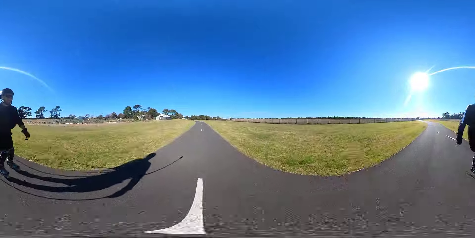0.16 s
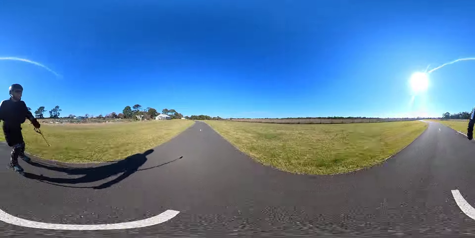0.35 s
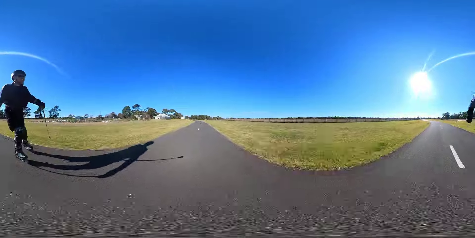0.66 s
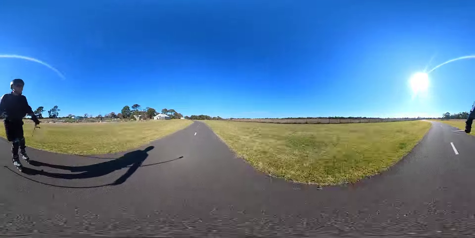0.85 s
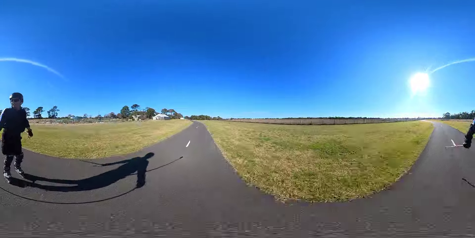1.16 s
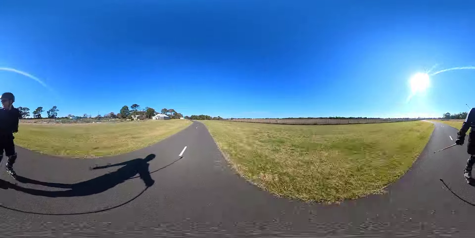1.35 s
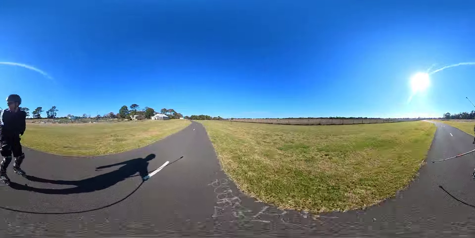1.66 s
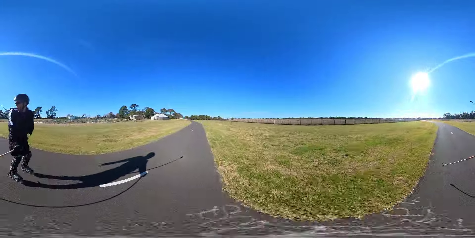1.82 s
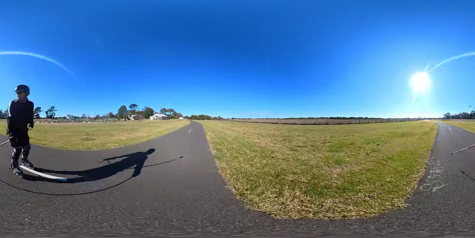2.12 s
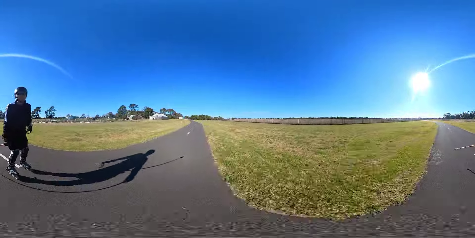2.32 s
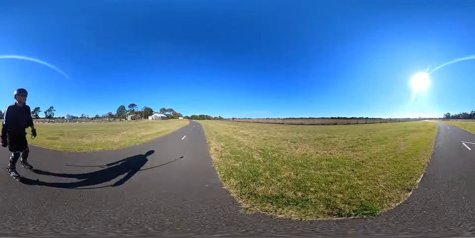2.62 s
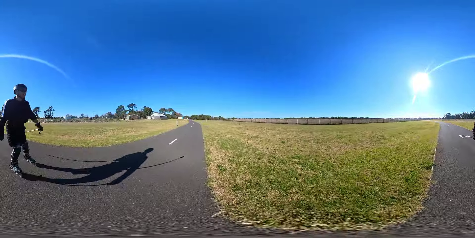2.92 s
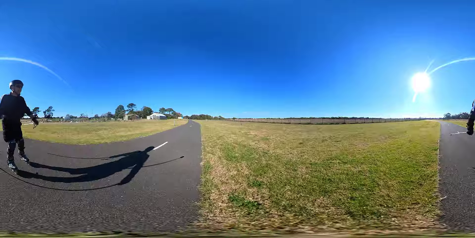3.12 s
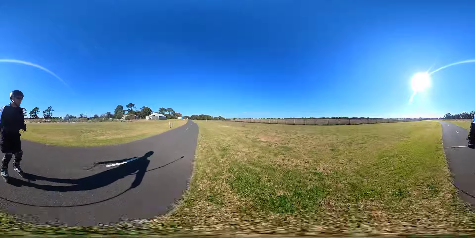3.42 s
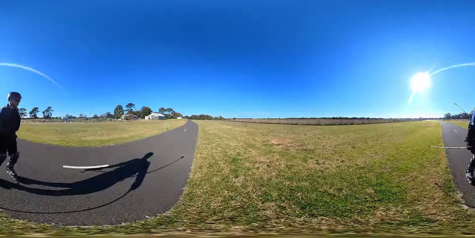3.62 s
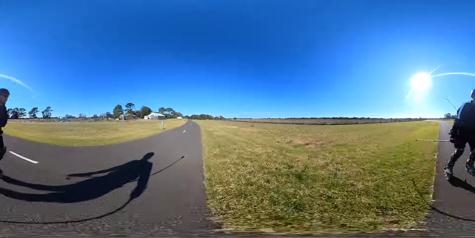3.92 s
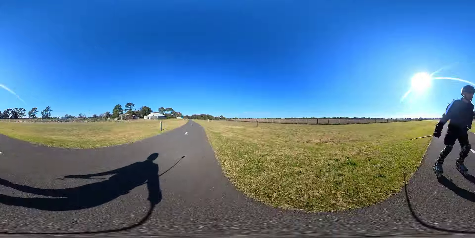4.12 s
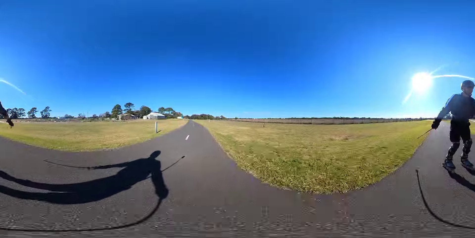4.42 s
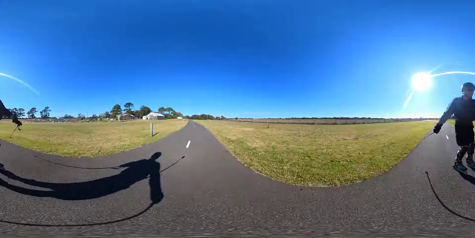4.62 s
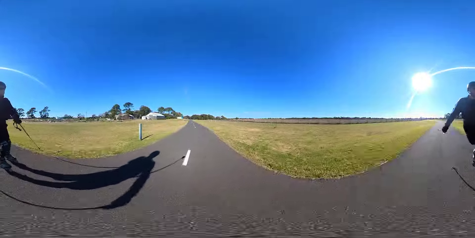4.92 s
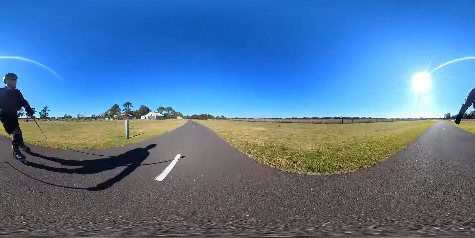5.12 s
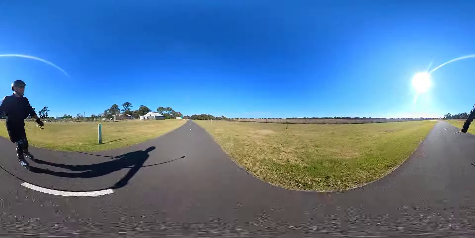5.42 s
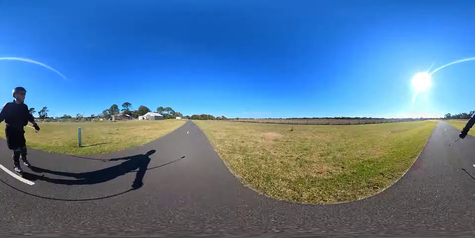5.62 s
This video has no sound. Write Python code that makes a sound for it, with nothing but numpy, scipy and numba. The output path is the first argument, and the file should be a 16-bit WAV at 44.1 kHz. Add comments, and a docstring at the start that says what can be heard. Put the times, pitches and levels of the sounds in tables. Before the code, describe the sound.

Inline skates roll along an asphalt path in the open, with no echo. The wheels make a steady, hollow rumble under a fine crackle of grit that rasps harder with each push, and small stones click against them. Near the middle a wheel edge scrubs briefly and the wheels whirr on a glide. Gusts boom and thump on the microphone travelling with the skater, ease for a while, then return.

```python
"""Inline skates roll along an open asphalt path, heard from a camera the skater carries on a pole.
The rough surface makes wheels and boots rumble; grit crackles, harder with each push, and rings the
frames. Stones knock, a wheel edge scrubs, the wheels whirr on a glide, and the grit dulls as the skater
swings round the camera. Gusts of head wind buffet the microphone. Open grass all round: no echo."""
import sys
import numpy as np
from scipy import signal
from scipy.fft import rfft, irfft
from scipy.io import wavfile
from scipy.ndimage import uniform_filter1d
from numba import njit

SR = 44100
rng = np.random.default_rng(int(sys.argv[2]) if len(sys.argv) > 2 else 0)


def digitize_waveform(pressure):
    """Quantize a signal to 16-bit integers and store it at the path in sys.argv[1].

    Rows of a 2-D input are taken as channels; values are limited to [-1, 1].
    """
    field = np.atleast_2d(pressure).T
    bounded = np.clip(field, -1, 1)
    quanta = np.round(bounded * 32767).astype(np.int16)
    wavfile.write(sys.argv[1], SR, quanta)


N = 254016
TIME = np.arange(N) / SR


def undb(db):
    """Decibels to gain."""
    return 10 ** (np.asarray(db) / 20)


def unit(x):
    """Scale to rms 1."""
    return x / np.sqrt(np.mean(x ** 2))


def curves(table):
    """Automation lanes: one value per sample for each column after the time."""
    times, *columns = np.transpose(table)
    return [np.interp(TIME, times, column) for column in columns]


def swell(start_s, hold_s, attack_s, release_s):
    """Envelope 0-1: fully up by start_s, holds, falls away."""
    return np.interp(TIME, np.cumsum([start_s - attack_s, attack_s, hold_s, release_s]), [0, 1, 1, 0])


def walk(rate_hz):
    """Random modulator, rms 1, gliding to a new value rate_hz times a second."""
    step = max(int(SR / rate_hz), 1)
    held = np.repeat(rng.standard_normal(N // step + 1), step)
    return unit(uniform_filter1d(held, step)[:N])


def colour(x, eq, size=16384):
    """Minimum-phase EQ through (freq_hz, level_db) points; white noise keeps its power."""
    hz, db = np.transpose(eq)
    bins_hz = np.maximum(np.arange(size // 2 + 1) * SR / size, 1)
    response = unit(undb(np.interp(np.log(bins_hz), np.log(hz), db)))
    cepstrum = irfft(np.log(response))
    cepstrum[1:size // 2] *= 2
    cepstrum[size // 2 + 1:] = 0
    return signal.fftconvolve(x, irfft(np.exp(rfft(cepstrum))))[:N]


@njit
def bandpass(x, hz, damping):
    """Sweepable state-variable band-pass; gain 1 at the centre."""
    y, band_state, low_state = np.empty(len(x)), 0., 0.
    for i in range(len(x)):
        g = np.tan(np.pi * hz[i] / SR)
        band = (band_state + g * (x[i] - low_state)) / (1 + g * (g + damping))
        band_state = 2 * band - band_state
        low_state += 2 * g * band
        y[i] = damping * band
    return y


def resonate(x, hz, db, damping):
    """Bell EQ: boost or cut the band round hz by db; both may move."""
    return x + (undb(db) - 1) * bandpass(x, hz * np.ones(N), float(damping))


def add(track, start_s, sound):
    """Mix a one-shot into the track."""
    i = int(np.clip(start_s * SR, 0, N - 1))
    track[i:i + len(sound)] += sound[:N - i]


# Faders of the skates, up as they come near and carry weight: time_s, rumble_db, crackle_db, sizzle_db
SKATE_FADERS = [(0.0, -31, -37, -43.5), (.27, -35, -45.5, -48), (.7, -35.5, -43, -48),
                (.91, -29.5, -42.5, -44.5), (1.05, -34.5, -44.5, -47.5), (1.57, -36, -41, -47.5),
                (1.83, -32.5, -38, -40.5), (2.35, -42, -47.5, -47), (2.8, -38, -46, -46),
                (3.1, -46, -45.5, -48), (3.45, -39.5, -50.5, -50.5), (3.62, -39, -45.5, -48),
                (4.4, -39, -45.5, -49), (4.58, -37.5, -43.5, -48), (4.66, -34, -42, -45),
                (4.8, -31.5, -40.5, -41.5), (5.15, -34, -41, -45.5), (5.4, -31, -42.5, -43),
                (5.76, -31.5, -40.5, -45)]
# Low body of the roll: freq_hz, level_db
RUMBLE_EQ = [(60, -9.5), (200, 2), (290, -1), (390, -1.5), (520, -3.5), (650, -6.5), (820, -9.5),
             (1000, -12.5), (1300, -19.5), (1800, -24), (2500, -47), (4000, -61)]
# Hollow tone of the boots, moving as the skater leans: time_s, pitch_hz, boost_db
BOOT_SWEEP = [(0, 370, 6), (.65, 383, 4.5), (1.05, 514, 1.5), (1.75, 455, 1.5), (2.4, 430, 8),
              (3.1, 310, -2), (3.6, 407, -1), (4.77, 357, 7.5), (5.1, 390, 1), (5.42, 543, 5),
              (5.76, 514, -1.5)]
# Midrange tone of the wheels: time_s, pitch_hz, boost_db
WHEEL_SWEEP = [(0, 1070, 3), (.9, 1260, 0), (1.3, 884, 3.5), (2.1, 774, 4.5), (3.2, 864, 2.5),
               (4.3, 1110, 6), (4.8, 985, -5), (5.3, 890, -0.5), (5.76, 850, -1)]

def rumble(level, surface, gain_db=4.0, surface_db=1):
    """The asphalt's texture shakes wheels and boots, which colour it with their tones."""
    shake = unit(colour(rng.standard_normal(N), RUMBLE_EQ) * undb(surface_db * surface))
    boots = resonate(shake, *curves(BOOT_SWEEP), damping=0.1)
    return undb(gain_db) * level * resonate(boots, *curves(WHEEL_SWEEP), damping=0.17)


def grit_contacts(surface, rate_hz=210, spread_db=1.5, largest_db=6.0, decay_s=0.0017, patch_db=1.1):
    """Grit envelope: the wheels meet grain after grain, each dying in milliseconds, over fine texture."""
    count, fine_texture = 4000, 0.66
    onsets = (np.cumsum(rng.gamma(2, 1 / 2, count)) * SR / rate_hz).astype(int)
    strength = undb(np.minimum(spread_db * rng.standard_normal(count), largest_db))
    hits = np.bincount(onsets[onsets < N], strength[onsets < N] ** 2, N)
    power = signal.lfilter([1], [1, -np.exp(-2 / (decay_s * SR))], hits)
    power = uniform_filter1d(uniform_filter1d(power, size=36), size=36)  # soft wheels round each attack
    return unit(np.sqrt(power / power.mean() + fine_texture) * undb(patch_db * surface))


# Crunch of grit on the wheels: freq_hz, level_db
CRACKLE_EQ = [(300, -15.5), (800, 3.5), (1400, -5.5), (1900, -3.5), (2300, 0), (2950, -4), (3400, -5),
              (4300, -6.5), (5000, -19.5), (7000, -13.5), (9000, -45.5)]
# Bright ring of the frames: freq_hz, level_db
SIZZLE_EQ = [(2000, -25), (4400, -7.5), (4750, 0.5), (5100, 2.5), (5450, 1), (5750, 1.5), (6200, -1),
             (6900, -5), (7600, -8.5), (8300, -15.5), (9000, -29.5)]

def grit(crackle, sizzle, contact, crackle_db=-1.53):
    """Each grain knocks on the wheels and sets off the brighter ring of the frames."""
    knock = unit(colour(contact * rng.standard_normal(N), CRACKLE_EQ))
    ring = unit(colour(contact * rng.standard_normal(N), SIZZLE_EQ))
    return undb(crackle_db) * crackle * knock + sizzle * ring


# Peaks and dips of the frames: pitch_hz, width_ratio, boost_db
FRAME_BANDS = [(3060, 0.039, 2.5), (5110, 0.049, -6), (5770, 0.021, -2), (7160, 0.043, 2)]

def frames(x, drift=0.026, wander_db=-2.5, grain_octaves=0.54, trim_db=-0.56):
    """Grains ring in a fast-jumping band; the frames' resonances drift and swell as the load shifts."""
    grain_hz = 3600 * 2 ** (grain_octaves * np.tanh(walk(110)))
    x = resonate(x, grain_hz, db=2.5, damping=0.17)
    for hz, width, db in FRAME_BANDS:
        centre_hz = hz * (1 + drift * walk(3.2))
        x = resonate(x, centre_hz, db + wander_db * np.tanh(walk(3.6)), damping=width)
    return undb(trim_db) * x


# Band of hiss in the side channel: freq_hz, level_db
HISS_EQ = [(2980, -36.5), (3130, 5.5), (4400, 6.5), (5600, 4.5), (6100, -3.5), (6700, -22), (7100, -31),
           (9000, -27.5)]

def stereo_hiss(crackle, sizzle, contact, side_db=-10.0):
    """A codec-like band of hiss at 3-6 kHz in the side channel, flickering with the grit."""
    side = np.sqrt(crackle * sizzle) * unit(colour(contact * rng.standard_normal(N), HISS_EQ))
    return undb(side_db) * np.array([[1], [-1]]) * side


# Gusts of head wind: start_s, hold_s, large_eddies_db, small_eddies_db
HEAD_GUSTS = [(0.11, 0.1, -28.5, -36), (0.438, 0.19, -19.5, -29), (0.693, 0.25, -24.5, -33),
              (1.023, 0.44, -24, -29), (1.535, 0.39, -23, -29), (2.023, 0.069, -18, -34.5),
              (2.21, 0.15, -26.5, -31), (2.533, 0.19, -24, -28.5), (2.903, 0.31, -27, -28),
              (3.266, 0.37, -26.5, -28.5), (3.946, 0.21, -32.5, -58), (4.696, 0.13, -30.5, -30),
              (5.292, 0.03, -27, -52), (5.45, 0.21, -27, -56), (5.604, 0.075, -20, -25.5)]
# Deep boom of large, slow eddies: freq_hz, level_db
LARGE_EDDY_EQ = [(12, -25.5), (25, -9.5), (40, -1), (65, 0), (110, -4), (160, -12.5), (260, -41.5),
                 (600, -79)]
# Low-mid flutter of small, fast eddies: freq_hz, level_db
SMALL_EDDY_EQ = [(70, -16), (125, 0.5), (165, 3.5), (235, -4), (350, -8.5), (550, -21), (1000, -40),
                 (2500, -66)]

def wind(stream_db=(-35.5, -37.5), large_flutter_db=3.0, small_flutter_db=3.5, small_trim_db=-2):
    """Eddies press on the microphone in uneven puffs; gusts add their power to a steady stream."""
    power = undb(stream_db)[:, None] ** 2  # rows: large eddies, small eddies
    for start_s, hold_s, large_db, small_db in HEAD_GUSTS:
        gust = swell(start_s, hold_s, attack_s=0.078, release_s=0.091)
        power = power + (undb([[large_db], [small_db]]) * gust) ** 2
    large, small = np.sqrt(power)
    boom = colour(rng.standard_normal(N), LARGE_EDDY_EQ) * undb(large_flutter_db * np.tanh(walk(26)))
    flutter = colour(rng.standard_normal(N), SMALL_EDDY_EQ) * undb(small_flutter_db * np.tanh(walk(40)))
    return large * unit(boom) + undb(small_trim_db) * small * unit(flutter)


# A skate bears down and grinds the grit: start_s, hold_s, crackle_boost_db, sizzle_boost_db
STRIDE_PUSHES = [(0.04, 0.038, 0.5, 2.5), (.15, 0.03, 1.5, 2), (0.261, 0.045, 6.5, 6.5),
                 (0.351, 0.045, 7, 9.5), (0.413, .035, 6.5, 5), (0.471, 0.055, 8, 6.5),
                 (0.545, 0.037, 5, 3.5), (0.753, 0.016, 1.5, 3.5), (0.88, .045, 2, 2.5),
                 (1.164, 0.07, 1, 4), (1.376, 0.077, 0.5, 1.5), (1.825, .05, -1, -1.5),
                 (1.943, 0.062, 4, -1), (2.052, .012, 1, -17), (2.095, 0.054, 6.5, -4),
                 (2.256, 0.022, 2, -0.5), (2.453, 0.06, 5.5, 4.5), (2.714, 0.06, 2, 3),
                 (2.85, 0.03, 2.5, 3), (3.13, 0.1, 2.5, 3.5), (3.806, 0.027, 3, 2.5),
                 (4.138, 0.069, 4, 4.5), (4.484, 0.037, 1.5, 1.5), (5.228, 0.032, 4.5, -1),
                 (5.373, 0.045, 2.5, 3)]
# The weight comes off a skate between strides: start_s, hold_s
STRIDE_LULLS = [(0.663, 0.026), (1.318, 0.015), (1.9, 0.02), (2.676, .02), (3.075, 0.034), (3.278, 0.04),
                (3.967, 0.038), (4.36, 0.021), (4.849, 0.013), (5.307, 0.017)]

def strides(rasp_hz=110, unsteady=0.22, slip_share=0.47, lull_db=-4, fade_s=0.0088):
    """Gains of crackle and sizzle: pushes accent them and judder them into a rasp; lulls duck them."""
    pushes = np.array([swell(start_s, hold_s, attack_s=0.006, release_s=0.021)
                       for start_s, hold_s, *_ in STRIDE_PUSHES])
    lulls = sum(swell(start_s, hold_s, fade_s, fade_s) for start_s, hold_s in STRIDE_LULLS)
    boosts_db = np.array(STRIDE_PUSHES)[:, 2:].T @ pushes + lull_db * lulls
    phase = np.cumsum(rasp_hz * (1 + unsteady * walk(90))) / SR % 1
    rasp = unit(uniform_filter1d(np.exp(-phase / slip_share), size=60))
    depth = 0.5 * pushes.max(axis=0)
    return undb(boosts_db) * np.sqrt(1 - depth + depth * rasp ** 2)


# Larger stones struck by a wheel: start_s, knock_db, crack_db, ring_db
STONE_HITS = [(0.0447, -34, -33, -51), (0.2803, -30.5, -36.5, -46), (0.3745, -36.0, -42, -39),
              (0.487, -44, -42, -37), (0.5016, -42, -35, -37.5), (0.565, -29, -38, -44),
              (0.7543, -39, -35, -37), (0.841, -38, -42, -50), (0.8976, -29, -36.5, -39.0),
              (0.9165, -34, -39.0, -46), (1.1546, -45, -41, -48), (1.1668, -44, -38.5, -47),
              (1.1898, -27.5, -40.0, -40), (1.2175, -40.5, -38.5, -40.5), (1.227, -45, -34.5, -38),
              (1.295, -27, -37, -40), (1.3522, -42, -38, -36.5), (1.4542, -45, -39, -42),
              (1.4905, -35, -36.5, -48), (1.635, -31, -40, -39.0), (1.6899, -44, -35, -40),
              (1.8394, -27, -32.5, -34), (1.8692, -44, -47, -32.5), (1.9507, -31, -36.5, -37),
              (1.9866, -33.0, -38, -42), (2.0842, -35, -37, -33), (2.0948, -36, -37, -44),
              (2.1132, -32, -36, -29), (2.1745, -38, -37, -36), (2.239, -41, -35, -37.5),
              (2.329, -33.5, -36, -35.5), (2.5631, -27.5, -36.5, -34.5), (2.728, -33, -54, -34.5),
              (2.7639, -40, -41, -42.0), (2.909, -48, -41, -36), (2.923, -41.0, -34, -35.5),
              (2.9713, -38, -39.0, -36.5), (3.141, -40.0, -40, -37), (3.217, -50.5, -39, -40),
              (3.3077, -54, -41.5, -53), (3.3728, -33, -44.5, -43.0), (3.757, -40, -42, -55),
              (3.8998, -33.5, -39.5, -40), (3.9304, -32, -39.0, -39), (3.9489, -35, -45, -36),
              (4.033, -35, -39.0, -40), (4.1083, -41, -40.5, -43), (4.1597, -40, -43, -39),
              (4.1907, -34, -41, -51), (4.1978, -34, -41, -34.5), (4.243, -37, -38.5, -40),
              (4.3292, -50, -40.5, -44), (4.433, -34, -44, -45), (4.494, -33, -38.5, -39),
              (4.6348, -31, -37.0, -40), (4.6837, -36, -39, -37), (4.8097, -38, -36, -36.5),
              (4.826, -38, -45, -42), (4.901, -29, -38, -35.5), (4.917, -46, -34.5, -36.5),
              (4.9674, -37, -42, -37.0), (5.063, -34.5, -36.5, -37.5), (5.093, -32, -38, -37.5),
              (5.2498, -30.5, -37, -45), (5.2749, -28, -36, -39), (5.3787, -25, -33.5, -35.5),
              (5.4111, -27.5, -39, -32.5), (5.47, -27, -39, -35), (5.5308, -28.5, -37.5, -49),
              (5.5906, -31.5, -37, -41.0), (5.7014, -31.5, -38, -44.5)]
# Body of the hit, stone on wheel: freq_hz, level_db
KNOCK_EQ = [(150, -24.5), (450, -3), (750, 8), (1200, -9), (1700, -27), (4000, -49)]
# Snap of the hit, stone on asphalt: freq_hz, level_db
CRACK_EQ = [(700, -23.5), (1400, 2), (2400, 0.5), (3000, -1), (4000, -4), (5000, -15.5), (9000, -51)]

def stones(attack_s=0.00068, decay_s=0.0018, tail=0.092, tail_s=0.011):
    """A stone knocks the wheel, cracks against the asphalt and rings the frame; no two sound alike."""
    track = np.zeros(N)
    t = np.arange(SR // 20) / SR
    envelope = (1 - np.exp(-(t / attack_s) ** 2)) * (np.exp(-t / decay_s) + tail * np.exp(-t / tail_s))
    for start_s, *levels_db in STONE_HITS:
        for db, eq in zip(levels_db, (KNOCK_EQ, CRACK_EQ, SIZZLE_EQ)):
            burst = colour(envelope * rng.standard_normal(len(t)), eq, size=1024)
            rms = np.sqrt(np.sum(burst ** 2) / (0.004 * SR))  # as if all its energy fell within 4 ms
            add(track, start_s, undb(db) * burst / rms)
    return track


# Single hard thumps of wind: time_s, level_db, width_ms, polarity (1 push, -1 suction)
WIND_THUMPS = [(0.326, -11.5, 1.7, 1), (0.367, -9.5, 1.37, 1), (0.456, -12, 1.1, 1), (0.474, -9, 2.9, 1),
               (0.489, -12.5, 2.2, -1), (0.531, -8, 1.7, -1), (0.611, -7.5, 0.75, -1), (0.619, -6, 0.95, 1),
               (0.633, -12, 0.98, 1), (0.691, -15, 4.2, 1), (0.7418, -13, 1.9, 1), (0.7776, -5, 1.3, 1),
               (0.824, -18, 2.1, 1), (0.975, -7.5, 1.05, 1), (1.053, -7, 2.5, 1), (1.101, -7.5, 1.65, 1),
               (1.115, -10.5, 1.7, 1), (1.17, -15.5, 3.1, -1), (1.243, -5, 1.64, 1), (1.272, -24, 2, -1),
               (1.308, -9.5, 1.2, 1), (1.33, -8.5, 2.2, -1), (1.408, -12, 2.4, 1), (1.455, -17.5, 2, 1),
               (1.482, -11, 3.2, -1), (1.541, -10.5, 1.05, 1), (1.571, -16.5, 4.3, 1), (1.667, -14.5, 3, 1),
               (1.709, -11, 2.8, -1), (1.82, -7, 2.3, 1), (1.884, -11.5, 1.9, 1), (2.012, -8.5, 2.4, 1),
               (2.061, -7.5, 3.6, -1), (2.081, -16, 4.2, -1), (2.149, -8.5, 3.6, -1), (2.195, -9, 1.75, 1),
               (2.872, -9.5, 2.4, -1), (2.898, -9.5, 1.9, 1), (3.003, -6, 1.6, 1), (3.054, -22, 1.1, -1),
               (3.07, -9.5, 1.01, 1), (3.164, -7, 0.94, -1), (3.4046, -7.5, 0.76, -1), (3.428, -7, 2, -1),
               (3.652, -10, 2.4, 1), (3.982, -14.5, 4, 1), (5.282, -16, 3.5, 1), (5.531, -10, 2.9, 1),
               (5.589, -18, 4.4, 1), (5.621, -8, 2.9, -1), (5.6567, -14, 1.4, -1), (5.713, -10.5, 2.3, 1),
               (5.724, -6, 1.86, 1)]

def buffets(gain_db=1.0, swirl_db=-20, swirl_s=0.015):
    """A strong eddy gives a short blow, a longer backswing and a rebound, and drags small eddies along."""
    thumps, swirl = np.zeros(N), np.zeros(N)
    t = np.arange(-SR // 20, SR // 20) / SR
    for time_s, db, width_ms, polarity in WIND_THUMPS:
        widths = t * 1000 / width_ms
        blow = np.exp(-widths ** 2)
        backswing = 0.58 * np.exp(-((widths - 1.63) / 2) ** 2)
        rebound = 0.16 * np.exp(-((widths - 4.3) / 2) ** 2)
        add(thumps, time_s + t[0], polarity * undb(db) * (blow - backswing + rebound))
        add(swirl, time_s + t[0], undb(db) * np.exp(-(t / swirl_s) ** 2))
    eddies = colour(rng.standard_normal(N), SMALL_EDDY_EQ)
    return undb(gain_db) * thumps + undb(swirl_db) * swirl * eddies


# Fader of a wheel edge scrubbing sideways: time_s, level_db
SCRUB_FADER = [(1.7, -54), (1.8, -45), (1.87, -41), (1.91, -70), (1.97, -37), (2.03, -48), (2.12, -39.5),
               (2.2, -61), (2.5, -75), (2.75, -55), (3, -74)]
# Resonances of the scrub: pitch_hz, width_hz, level_db
SCRUB_BANDS = [(5000, 300, -6), (5840, 270, 18.5), (6620, 270, 15.5)]

def scrub(gain_db=-2.5, judder_hz=185, unsteady=0.25, slip_share=0.21):
    """A wheel edge sticks and slips in a quick judder; each slip sings in narrow, hissy bands."""
    phase = np.cumsum(judder_hz * (1 + unsteady * walk(60))) / SR % 1
    slips = rng.standard_normal(N) * np.exp(-phase / slip_share)
    ring = sum(undb(db) * signal.lfilter(*signal.iirpeak(hz, hz / width_hz, fs=SR), slips)
               for hz, width_hz, db in SCRUB_BANDS)
    return undb(gain_db + curves(SCRUB_FADER)[0]) * unit(colour(ring, SIZZLE_EQ))


# Fader of the wheels' whirr on a long glide: time_s, level_db
WHIRR_FADER = [(2.15, -67), (2.3, -50), (2.5, -51.5), (2.65, -47), (2.75, -51.5), (2.9, -54), (3.1, -60),
               (3.4, -69)]
# Resonances of the gliding wheels: pitch_hz, width_hz, level_db
WHIRR_BANDS = [(2260, 92, 0.5), (2900, 330, 5), (3650, 160, -10.5), (4960, 710, 1.5), (5880, 650, 1.5)]

def whirr(contact, gain_db=1.0, drift=0.0093):
    """On a clean glide the wheels ring on in a few slightly drifting bands."""
    drive = contact * rng.standard_normal(N)
    ring = np.zeros(N)
    for hz, width_hz, db in WHIRR_BANDS:
        centre_hz = hz * (1 + drift * walk(5))
        damping = width_hz / hz
        ring += undb(db) * bandpass(bandpass(drive, centre_hz, damping), centre_hz, damping)
    return undb(gain_db + curves(WHIRR_FADER)[0]) * unit(ring)


def body_shade(x):
    """The skater swings round and shades the skates: their bright peak slides down and the top dulls."""
    shade = swell(start_s=4.05, hold_s=0.54, attack_s=0.37, release_s=0.15)
    peak_hz = np.interp(shade, [0, 1], [2740, 1730])
    peak_db = np.interp(shade, [0, 1], [0.6, 7.5])
    top_db = np.interp(shade, [0, 1], [-2.5, -8.5])
    x = resonate(x, peak_hz, peak_db, damping=0.22)
    return resonate(x, hz=7840, db=top_db, damping=0.56)


def scene():
    """Skates on the path, wind on the microphone."""
    rumble_level, *grit_levels = undb(curves(SKATE_FADERS))
    crackle, sizzle = strides() * grit_levels
    surface = walk(45)  # coarse and smooth patches pass under the wheels
    contact = grit_contacts(surface)
    crunch = body_shade(frames(grit(crackle, sizzle, contact)) + stones())
    skates = rumble(rumble_level, surface) + crunch + scrub() + whirr(contact)
    return skates + stereo_hiss(crackle, sizzle, contact) + wind() + buffets()


def record(dry):
    """The camera cuts the top with a steep low-pass."""
    cutoff_hz = 9100
    return signal.sosfilt(signal.ellip(8, 0.2, 70, cutoff_hz, fs=SR, output="sos"), dry)


dry = scene()
out = record(dry)
digitize_waveform(out)
```